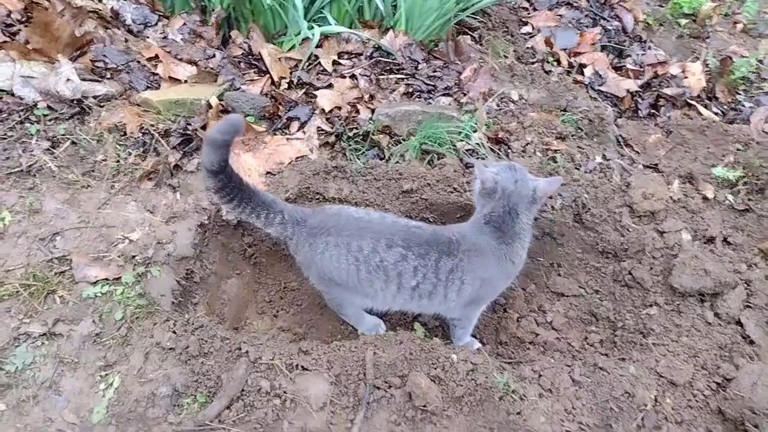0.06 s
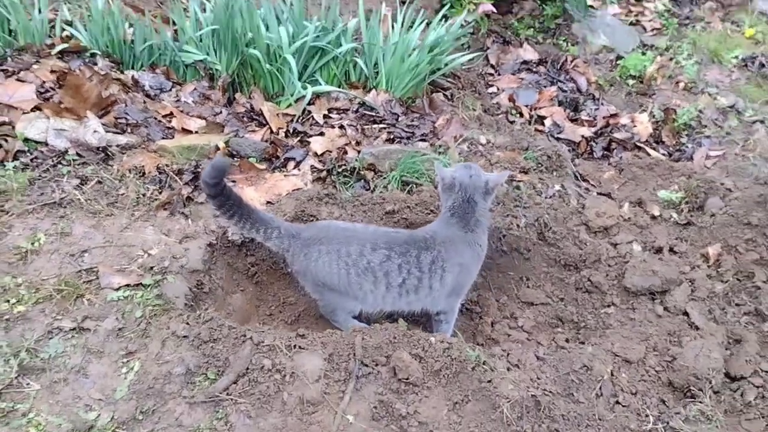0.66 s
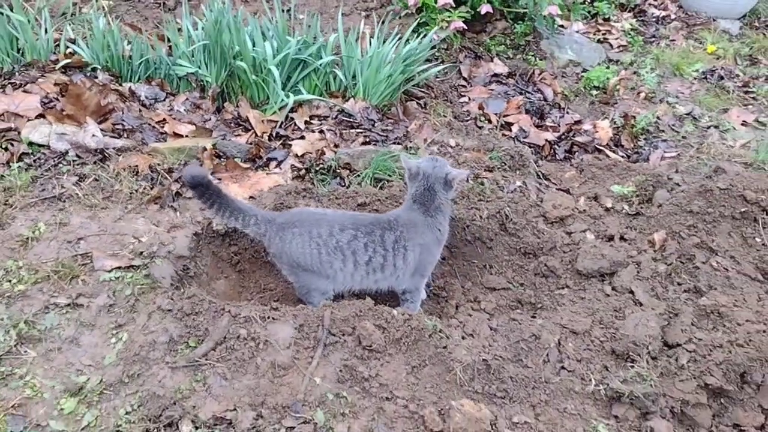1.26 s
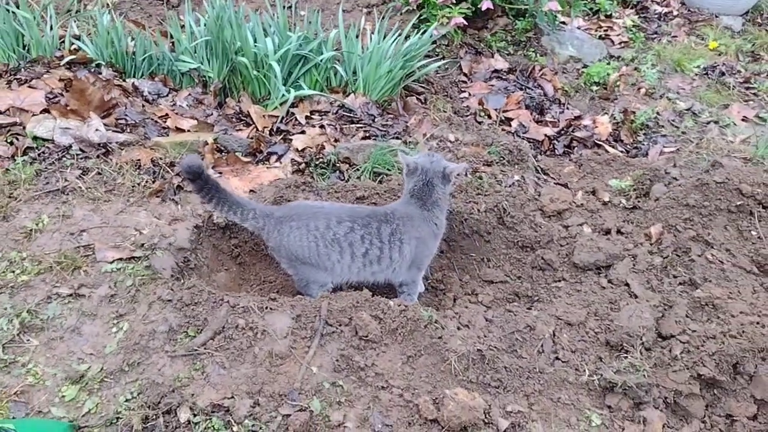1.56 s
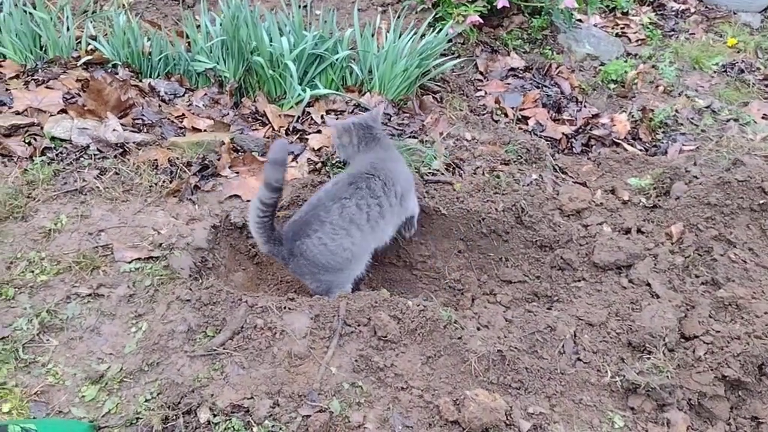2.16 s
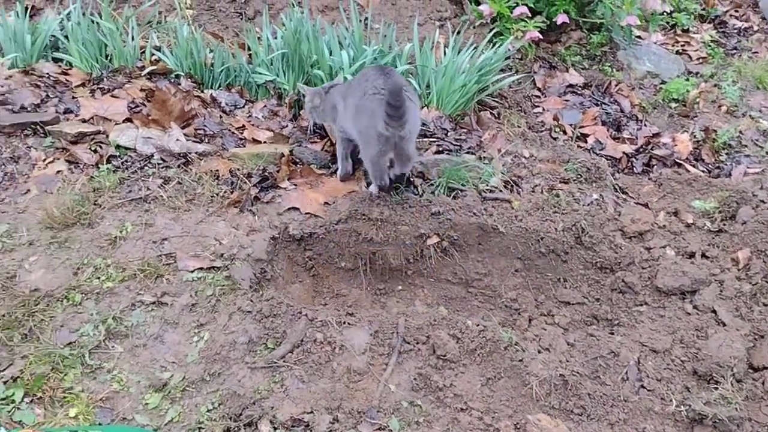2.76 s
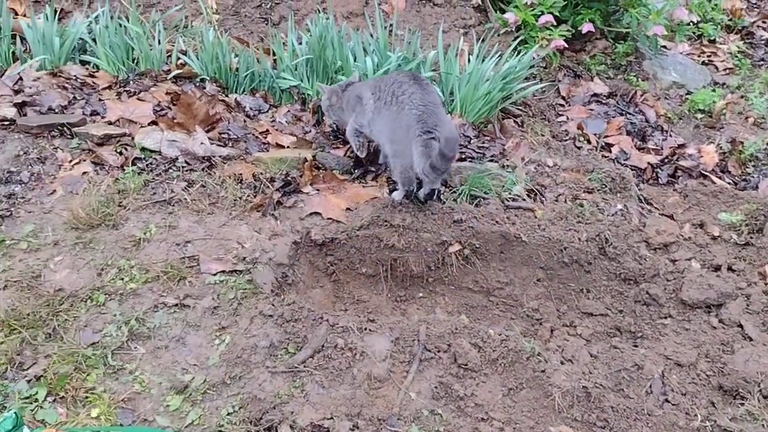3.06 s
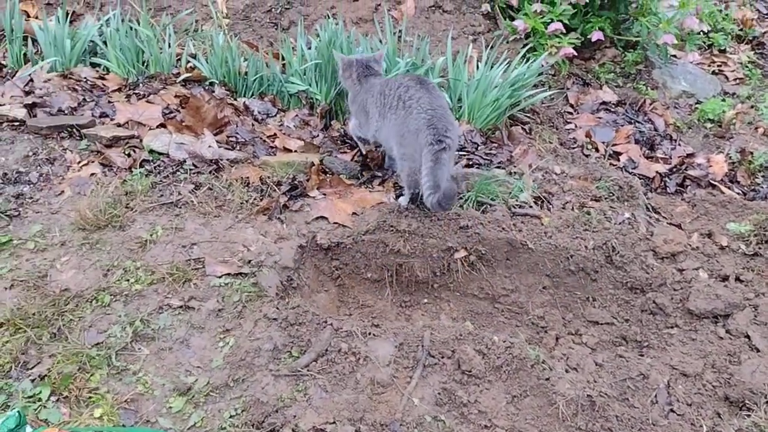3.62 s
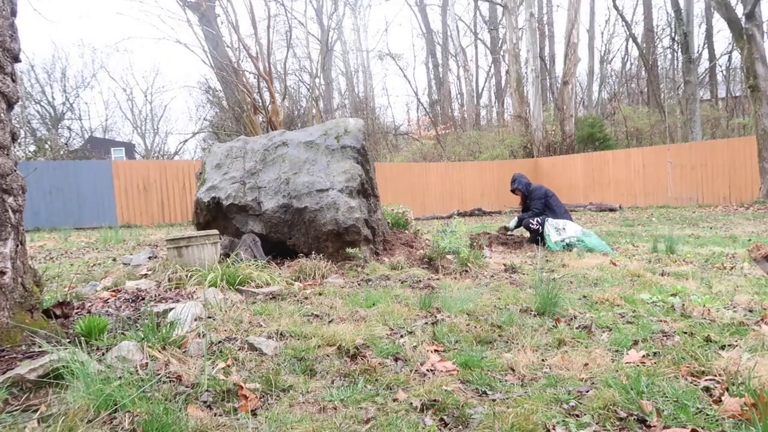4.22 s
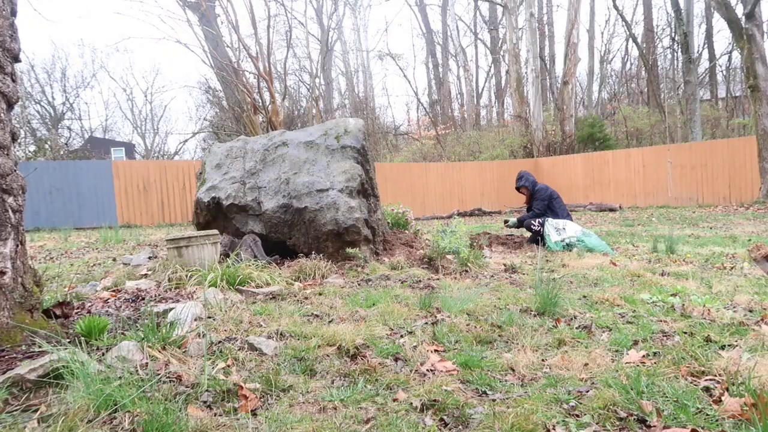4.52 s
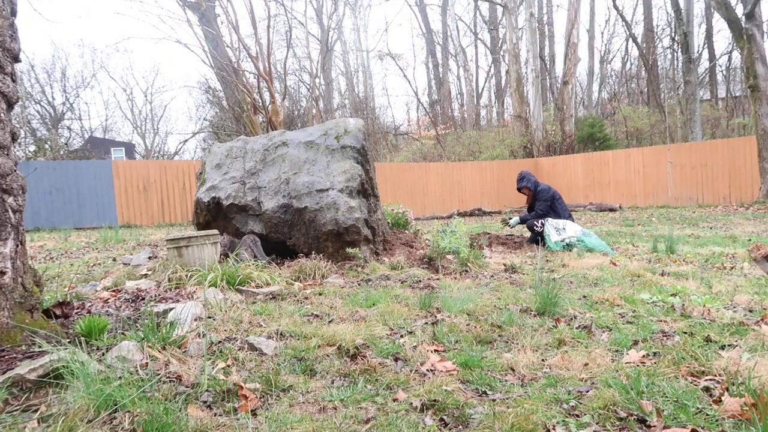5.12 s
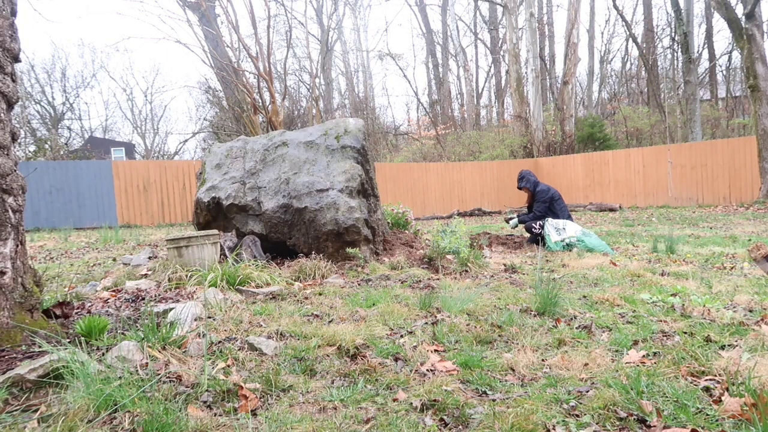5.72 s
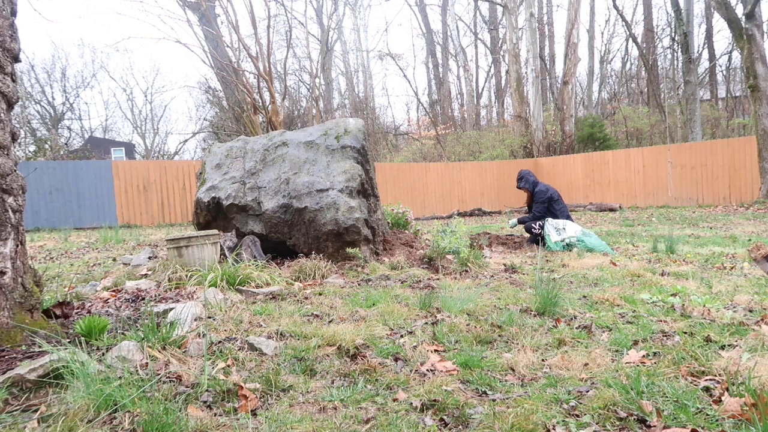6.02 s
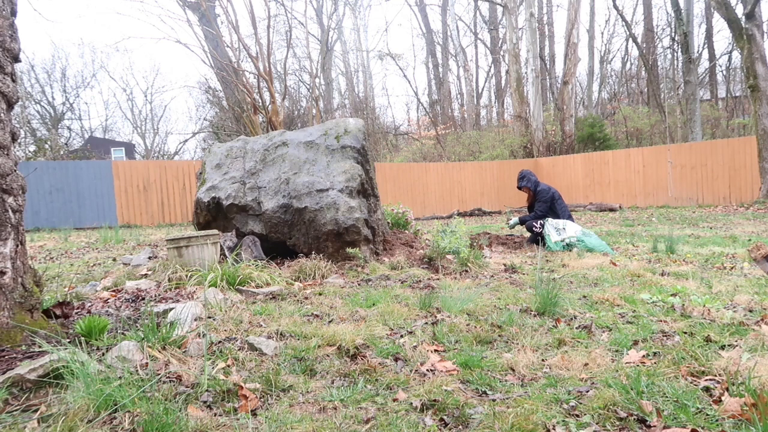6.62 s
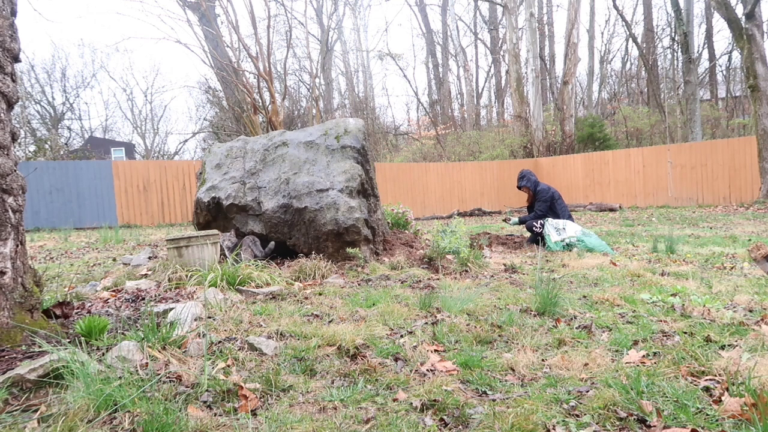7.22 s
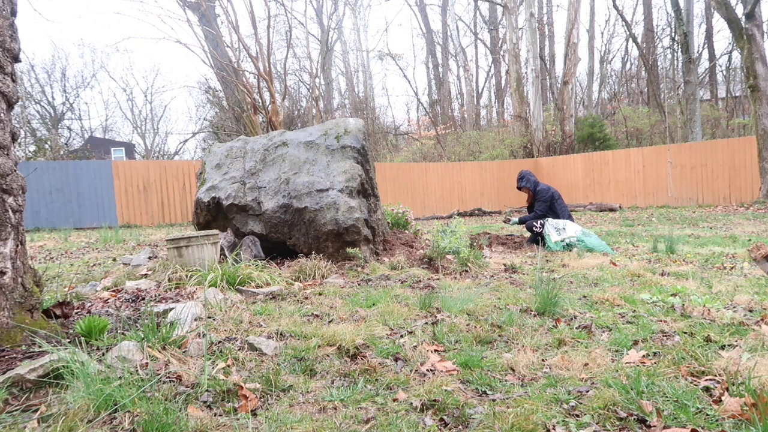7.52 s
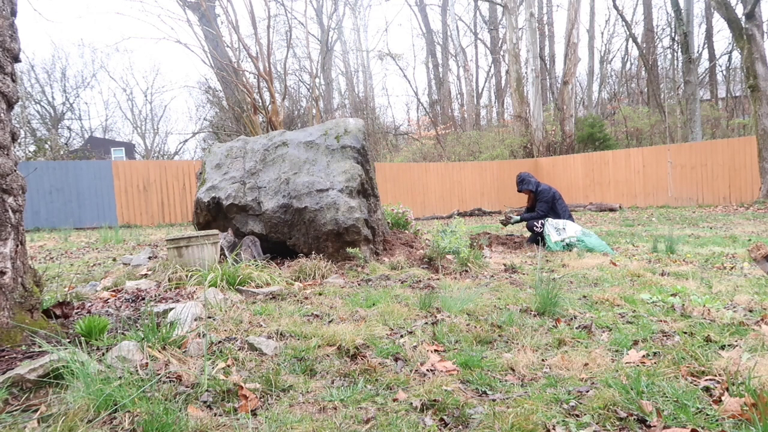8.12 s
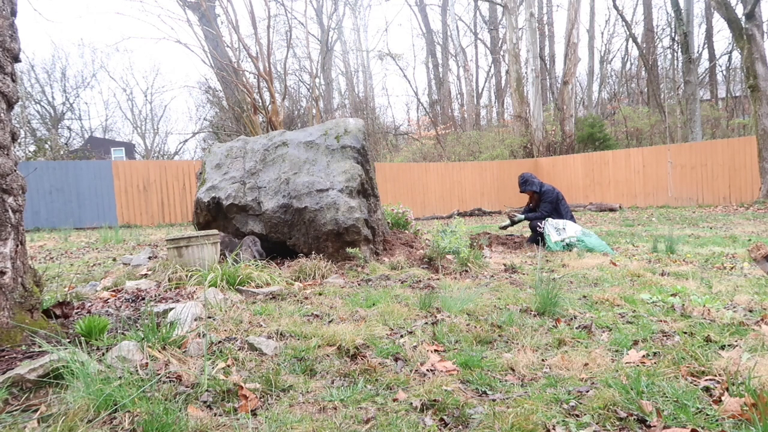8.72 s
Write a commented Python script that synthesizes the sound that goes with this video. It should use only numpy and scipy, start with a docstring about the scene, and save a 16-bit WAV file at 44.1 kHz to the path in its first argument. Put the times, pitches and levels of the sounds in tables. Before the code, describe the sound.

Faint birds chirp in a wet garden above low, far-off traffic, with a few close drips, a tiny leaf rustle and two soft paw steps from a cat. The sound then cuts to a louder spot in the open, where light rain hisses steadily over a rumbling road. Sharp, irregular drops hit leaves beside the microphone, and birds call from the nearby trees in short echoing phrases, closing with a quick trill.

```python
"""A wet garden from two microphone positions. First a quiet flower bed: traffic rumbles far off, drips tap the
leaves close by, birds whistle short motifs over a distant flock, and a cat stirs dead leaves and sets its paws
on the soil. At 3.6 s, after a moment of silence, the open lawn: a loud, steady traffic rush and light rain over
road rumble and hum, with drops ringing on leaves near the microphone. From 5.4 s birds call again, each at its
own pace and echoing in the wood, and a trill ends the scene."""
import sys
import numpy as np
from scipy import signal
from scipy.fft import rfft, irfft, next_fast_len
from scipy.io import wavfile
from scipy.ndimage import uniform_filter1d, map_coordinates

SR = 44100
rng = np.random.default_rng(int(sys.argv[2]) if len(sys.argv) > 2 else 0)


def materialize(psi):
    """Save the field psi as 16-bit PCM at rate SR to the path in sys.argv[1].

    A 1-D psi becomes a single channel; in a 2-D psi each row is a channel.
    """
    bounded = np.clip(np.atleast_2d(psi).T, -1, 1)
    quanta = np.round(bounded * 32767).astype(np.int16)
    wavfile.write(sys.argv[1], SR, quanta)


N = 386757

BED_END_S, LAWN_START_S, LAWN_FADE_IN_S = 3.594, 3.628, 0.014
AIR_DB, RAIN_DB, TOP_HZ = -68.5, -56, 15750

# far traffic from the flower bed: t/s, level/dB
BED_TRAFFIC_LEVELS = [(0.15, -59.5), (0.7, -58), (1.1, -55.5), (1.4, -58.5), (1.85, -58.8), (2.12, -57),
                      (2.5, -61), (3.15, -58.5), (3.4, -59.5)]
# spectra of that traffic, the still air and the dead leaves: f/Hz, level/dB
BED_TRAFFIC_SPECTRUM = [(13, -66), (22, -28), (64, -7), (119, -0.5), (172, -7), (188, -10.5), (219, -6.5),
                        (312, -20), (354, -18), (450, -44), (580, -57), (990, -120)]
BED_AIR_SPECTRUM = [(200, -8), (380, 0.5), (600, -1), (830, 0), (1050, -3.5), (1400, -9), (1750, -5),
                    (2300, -3.5), (3000, -8.5), (4600, -12), (6800, -15), (8800, -25), (15500, -27.5)]
LEAF_SPECTRUM = [(300, -16), (900, -6), (2000, -11.5), (4500, 1.5), (6200, 0.5), (8000, -10.5), (15500, -9)]
# out on the lawn: t/s, road level/dB, relative rush level/dB
LAWN_LEVELS = [(3.78, -36.5, -46), (3.98, -35, -44), (4.17, -37.5, -46), (4.55, -35.5, -45),
               (4.75, -38, -46.5), (4.97, -34.5, -47.5), (5.27, -37, -47), (5.6, -36, -48),
               (6.32, -35, -47), (6.85, -37, -47.5), (7.14, -34.5, -47), (7.6, -36.5, -46),
               (8.05, -36, -46.5), (8.65, -35.5, -48)]
# spectra of the road, its broad traffic rush and the rain on the grass: f/Hz, level/dB
ROAD_SPECTRUM = [(12, -31), (20, -17), (48, -2.5), (107, 0.5), (163, -4), (195, -8.5), (267, -9.5),
                 (430, -22), (520, -22), (680, -47), (1140, -120)]
RUSH_SPECTRUM = [(250, -12), (450, -3), (660, -0.5), (810, 2.5), (900, 0), (1020, 3), (1400, 0.5),
                 (2000, -4), (3200, -10), (4200, -18.5), (7000, -31), (15000, -55.5)]
RAIN_SPECTRUM = [(800, -6), (2200, 5), (3300, 1), (4200, -3.5), (4900, -3.5), (6300, -9), (8000, -12),
                 (10000, -16.5), (12500, -28), (15500, -63)]
# wavering tones in the road noise: f/Hz, level/dB
ROAD_TONES = [(59.2, -45.5), (117.5, -47), (1012, -59.5)]
# stereo width at each position: f/Hz, side minus mid/dB
BED_WIDTH = [(50, -17), (130, -17.5), (300, -11.5), (500, -2.5), (800, -0.5), (1300, 5.5), (2300, -4),
             (3200, 6), (4000, 1), (5000, 0), (15000, 0.5)]
LAWN_WIDTH = [(60, -66), (110, -59), (170, -28.5), (270, -16.5), (450, -8.5), (700, -13), (1050, -13),
              (2000, -11.5), (3300, -7.5), (5500, 1), (9000, 4), (12500, 15), (15500, 20)]
# the lawn leans slightly right: f/Hz, left minus right/dB
LAWN_BALANCE = [(400, 0), (700, -.8), (1200, -2.3), (1900, -1), (3000, -1), (5000, -.3), (12000, 0)]

# distant flock, a row per pitch band: three of chirps, then their thin high overtones
# low f/Hz, high f/Hz, rate/(notes/s), note length/s, level/dB, swell/(dB/s), fade/(dB/s)
FLOCK_BANDS = [(2294, 2800, 22, 0.0297, -67.5, 14, 17), (3046, 3700, 18, 0.0279, -66, 12.5, 7),
               (3600, 4150, 14, 0.0249, -73, 8.5, 16), (4810, 6500, 30, .03, -75.5, 0.5, 36)]
FLOCK_FULL_S, FLOCK_FADES_S = 1.42, 2.62  # the flock is loudest between these times

# the cat brushes through dead leaves: t/s, length/s, level/dB
LEAF_STIRS = [(.69, .06, -69.5), (0.909, .014, -64), (.977, 0.029, -59.5), (1.06, 0.058, -67)]
STIR_RISE_DB_PER_S, STIR_FALL_DB_PER_S = 800, 420
# its paws on loose soil: t/s, level/dB, left minus right/dB
PAW_STEPS = [(1.083, -51, -1), (3.313, -50.5, -11)]
PAW_RISE_S, PAW_T60_S = 0.0015, 0.034

# motifs of the nearer birds, a row per note:
# t/s into the motif, length/s, start f/Hz, end f/Hz, level/dB relative to the call, direct share (0-1)
THIN_NOTE = [(0, 0.097, 3310, 3260, -2, 0.66)]
DOWNSLUR = [(0, .013, 3650, 3240, -5, 0.65), (.015, 0.0249, 3100, 2398, 1.5, 0.77)]
DOWN_UP = [(0, .03, 3240, 3345, -4, .4), (.025, .04, 3700, 4155, -2.5, .15),
           (.066, 0.0158, 3910, 3260, -4, 0.63), (.131, .021, 3480, 4200, -0.5, .85),
           (.2, 0.0246, 2340, 2640, -5, 0.6)]
PIP = [(0, 0.019, 4270, 4200, -4, .75)]
CAROL = [(0, 0.044, 3250, 3350, -7, .55), (.1, .1, 3370, 3140, -4, 0.524), (.2, .12, 3305, 2970, -5, .3)]
ARCHED_CAROL = [(0, .11, 3380, 3660, -2, 0.614), (0.098, 0.101, 3580, 3660, -4, 0.452),
                (.15, .14, 3640, 3360, -6, 0.21), (.06, 0.094, 2840, 2840, -6, .55),
                (.14, .14, 2730, 2550, -4, .4)]
PICKUP = [(0, 0.014, 3730, 3320, 0, 0.96), (.025, .012, 2860, 2620, 0, .9)]
TRILL = [(0, 0.0159, 3884, 3170, 1, 0.91), (.028, 0.0162, 2980, 2700, -1.5, 0.55)]
# calls in the trees around the flower bed: t/s, level/dB, pitch factor
THIN_CALLS = [(.68, -68, 1), (.8, -68, 0.96), (.88, -67, 1)]
DOWNSLUR_CALLS = [(1.026, -61.5, 0.98), (1.268, -60, 0.95), (1.518, -60, 1), (1.762, -59.5, 1),
                  (2.004, -59, 0.98), (2.254, -58, 0.99), (2.503, -58.5, 1), (2.754, -60.5, 0.96),
                  (3.01, -64, 0.98), (3.272, -65, 1)]
DOWN_UP_CALLS = [(1.056, -62.5, 1), (1.435, -61, 1), (1.808, -59, 0.98), (2.187, -58, 1)]
# calls from the wood by the lawn: t/s, level/dB, pitch factor
PIP_CALLS = [(5.42, -41, 0.97), (5.75, -42.5, 0.98)]
CAROL_CALLS = [(5.72, -45.5, 0.97), (6.85, -45.5, 0.99)]
ARCHED_CAROL_CALLS = [(6.165, -45, 1.03), (7.285, -44, 1)]
PICKUP_CALLS = [(8.242, -39.5, 0.97)]
TRILL_CALLS = [(8.328, -40.5, 0.99), (8.422, -42.5, 0.98), (8.516, -43.5, 0.98), (8.619, -43, 1),
               (8.72, -42, .98)]
NOTE_SCATTER, NOTE_WAVER = 0.0111, 0.048  # shares by which a fully scattered note strays and wavers
ECHO_DB = -0.5

# drops on leaves and soil close to the microphone:
# t/s, peak level/dB, ring f/Hz, splash gain/dB, left minus right/dB
NEAR_DROPS = [(.257, -54, 7340, -27, -4), (.372, -53, 5360, -25, -8), (.487, -48, 6300, -16, -3),
              (.648, -52, 7000, -18, 0), (.679, -55, 7500, -3, 0), (.842, -45.5, 4730, -17, -9),
              (3.671, -28.5, 4280, -11, 0), (3.997, -36, 3400, -8, 0), (4.195, -45, 5200, -22, 0),
              (4.339, -44, 9000, -3, 0), (4.379, -47, 7500, -16, 0), (4.473, -45, 5900, -2, 2),
              (4.792, -38, 4380, -19, 4), (4.832, -36.5, 4580, -7, 0), (5.106, -49, 3800, -14, 0),
              (5.126, -32, 5300, -24, 0), (5.153, -27, 2150, -6, -3), (5.153, -29, 6350, -2, -2),
              (5.253, -44.5, 7000, 0, 0), (5.330, -27, 3030, -7, 1), (5.330, -37.5, 6500, 0, 0),
              (5.372, -42, 5300, -22, 0), (5.452, -29, 3100, -9, -3), (5.452, -36, 4600, -22, 0),
              (5.463, -49, 7940, 2, 2), (5.586, -37, 4200, -11, 0), (5.601, -25, 2200, 0, -2),
              (5.607, -37, 5030, -12, 0), (5.608, -47, 9800, -16, 0), (6.163, -30.5, 4400, -23, 1),
              (6.163, -36, 2600, -12, 1), (6.482, -43, 8350, 0, 0), (6.546, -24.5, 2590, -7, -4),
              (6.665, -38, 4280, -22, -2), (6.70, -44, 5200, -10, 0), (7.077, -38, 4970, -19, -5),
              (7.077, -50, 9500, -3, 0), (7.101, -36, 3700, -17, 0), (7.197, -35.5, 3400, -11, 0),
              (7.22, -32.5, 1600, -16, 5), (7.309, -25.5, 2710, -6, -1), (7.313, -27, 4660, -24, 6),
              (7.672, -39, 5000, -28, 0), (7.975, -43, 6900, -2, 0), (8.012, -24.5, 4330, -20, 2),
              (8.247, -25, 2240, -8, 0), (8.248, -31, 4300, -4, 0), (8.253, -25, 2350, -9, -4)]
DROP_RISE_S, RING_CYCLES = 0.00022, 22  # a leaf gives way under the drop, then rings
LONGEST_RING_S = 0.009  # low, soft hits are damped by the soil
SPLASH_RISE_S, SPLASH_T60_S, SPLASH_TAIL_T60_S = 0.00037, 0.017, 0.16
PAT_HZ, PAT_SCATTER, PAT_T60_S = 1866, 0.17, 0.0078  # a wet hit's dull pat varies from leaf to leaf


def amp(db):
    """Decibels to gain."""
    return 10 ** (np.asarray(db) / 20)


def unit(x):
    """Scale to rms 1."""
    return x / np.sqrt(np.mean(x ** 2) + 1e-20)


def decay(t, t60):
    """A gain that falls 60 dB in t60 seconds."""
    return amp(-60 * t / t60)


def attack(t, rise_s):
    """A gain that climbs from 0 towards 1."""
    return 1 - np.exp(-t / rise_s)


def pan(db):
    """Two channel gains, the left db above the right."""
    return amp([[db / 2], [-db / 2]])


def along(points, hz):
    """Read (f/Hz, value) points on a log axis."""
    knots_hz, values = np.transpose(points)
    return np.interp(np.log(hz + 1), np.log(knots_hz + 1), values)


def curves(rows):
    """One value per sample for each column after the time."""
    times, *columns = np.transpose(rows)
    return [np.interp(np.arange(N) / SR, times, column) for column in columns]


def wobble(rate):
    """A smooth random curve, rate knots a second."""
    knots = rng.standard_normal(int(N * rate / SR) + 4)
    return map_coordinates(knots, [np.arange(N) * rate / SR])


def filtered(x, response):
    """Filter x by a gain given as a function of frequency."""
    size = next_fast_len(N + SR // 2)
    return irfft(rfft(x, size) * response(np.fft.rfftfreq(size, 1 / SR)), size)[..., :N]


def add(track, s, sound):
    """Mix a sound into a track at s seconds."""
    part = track[..., max(round(s * SR), 0):][..., :sound.shape[-1]]
    part += sound[..., :part.shape[-1]]


def patchy_noise(depth_db):
    """Two white noises whose gain drifts in patches of time and frequency."""
    spectra = signal.stft(rng.standard_normal((2, N)), nperseg=512)[2]
    patches = uniform_filter1d(rng.standard_normal(spectra.shape[1:]), size=6, axis=0)
    patches = unit(uniform_filter1d(patches, size=14, axis=1))
    return unit(signal.istft(spectra * amp(depth_db * patches), nperseg=512)[1][:, :N])


def band_noise(samples, low_hz, high_hz, order=3):
    """Two band-limited noises of rms 1."""
    band = signal.butter(order, [low_hz, min(high_hz, SR / 3)], "bandpass", fs=SR, output="sos")
    return unit(signal.sosfilt(band, rng.standard_normal((2, samples))))


def grains(rate, spread_db, low_hz, high_hz, cycles):
    """Mid and side of tiny impacts, each a damped ring of its own size, pitch and direction."""
    when, size, pitch, turn = rng.random((int(rate * N / SR), 4)).T[..., None]
    age = np.arange(128)  # samples
    phase = low_hz * (high_hz / low_hz) ** pitch * age / SR
    gain = amp(-spread_db * np.log(np.maximum(size, 0.003)))
    rings = gain * np.sin(2 * np.pi * phase) * np.exp(-phase / cycles)
    at = ((when * N).astype(int) + age).ravel()
    directions = np.cos(2 * np.pi * turn), np.sin(2 * np.pi * turn)
    return unit(np.array([np.bincount(at, (rings * weight).ravel(), N)[:N] for weight in directions]))


def stereo(pair, spectrum, width):
    """Colour two signals as mid and side; left and right come out with a mid of rms 1."""
    mid, side = filtered(pair, lambda hz: amp([along(spectrum, hz),
                                               along(spectrum, hz) + along(width, hz)]))
    return np.array([mid + side, mid - side]) / np.std(mid)


def wood_echo(x, t60, build_s):
    """Trunks scatter a sound into a stereo echo that builds up and dies away."""
    t = np.arange(SR) / SR
    tail = rng.standard_normal((2, SR)) * decay(t, t60) * attack(t, build_s)
    return signal.fftconvolve(x[None], tail / np.linalg.norm(tail[0]), axes=1)


def whistle(length_s, start_hz, end_hz, waver=0, arch=0, octave_db=-28):
    """One slurred bird note with a weak octave; waver and arch bend it by a share of its pitch."""
    progress = np.linspace(0, 1, int(length_s * SR))
    swell = np.abs(np.sin(np.pi * progress))
    quiver = map_coordinates(rng.standard_normal(64), [progress * length_s * 200], mode="mirror")
    hz = (start_hz + (end_hz - start_hz) * progress) * (1 + arch * swell + waver * quiver)
    phase = 2 * np.pi * np.cumsum(hz) / SR
    return (np.sin(phase) + amp(octave_db) * np.sin(2 * phase)) * np.sqrt(swell)


def traffic_and_air():
    """Far traffic rumbles under the still air of the flower bed."""
    traffic_db, = curves(BED_TRAFFIC_LEVELS)
    traffic = amp(traffic_db) * stereo(patchy_noise(depth_db=1.0), BED_TRAFFIC_SPECTRUM, BED_WIDTH)
    air = amp(AIR_DB) * stereo(patchy_noise(depth_db=1.54), BED_AIR_SPECTRUM, BED_WIDTH)
    return traffic + air


def chatter(low_hz, high_hz, rate, length_s):
    """Many far chirps slur up or down around one pitch band, blurred by the trees, evenly loud."""
    notes = np.zeros(N)
    for when, shift, rising in rng.random((int(rate * N / SR), 3)):
        ends_hz = np.array([low_hz, high_hz]) + (shift - 0.5) * (high_hz - low_hz) / 2
        start_hz, end_hz = ends_hz if rising > 0.5 else ends_hz[::-1]
        add(notes, when * N / SR, whistle(length_s, start_hz, end_hz))
    blurred = wood_echo(notes, t60=0.98, build_s=0.0017)[:, :N] + 0.35 * notes
    power = np.abs(uniform_filter1d(np.mean(blurred ** 2, axis=0), size=8000))
    return blurred / np.sqrt(power + 0.014 * power.mean())


def flock():
    """A distant flock swells, holds and fades, a little right of the microphone."""
    track, t = np.zeros((2, N)), np.arange(N) / SR
    early_s, late_s = np.maximum(FLOCK_FULL_S - t, 0), np.maximum(t - FLOCK_FADES_S, 0)
    for low_hz, high_hz, rate, length_s, db, swell, fade in FLOCK_BANDS:
        track += amp(db - swell * early_s - fade * late_s) * chatter(low_hz, high_hz, rate, length_s)
    return track * pan(-2.6)


def cat_in_leaves():
    """Each stir of the cat draws a soft swish from the damp leaves that rises fast, holds and settles."""
    stir, t = np.zeros(N), np.arange(N) / SR
    for s, length_s, db in LEAF_STIRS:
        early_s, late_s = np.maximum(s - t, 0), np.maximum(t - s - length_s, 0)
        stir += amp(db - STIR_RISE_DB_PER_S * early_s - STIR_FALL_DB_PER_S * late_s)
    swish = grains(rate=8000, spread_db=1.6, low_hz=2010, high_hz=12000, cycles=0.6)
    return stir * stereo(swish, LEAF_SPECTRUM, BED_WIDTH)


def cat_paws():
    """A paw set down on soil gives a short muffled knock with no ring."""
    track, t = np.zeros((2, N)), np.arange(SR // 20) / SR
    for s, db, pan_db in PAW_STEPS:
        soil = band_noise(len(t), low_hz=470, high_hz=1200, order=4)
        knock = soil * decay(t, PAW_T60_S) * attack(t, PAW_RISE_S)
        add(track, s, amp(db) * pan(pan_db) * knock)
    return track


def road(level_db):
    """The road as it carries to the lawn: a low rumble with wavering tones in it."""
    t = np.arange(N) / SR
    gain = amp(level_db + 0.15 * wobble(rate=9.1))
    rumble = gain * stereo(patchy_noise(depth_db=0.66), ROAD_SPECTRUM, LAWN_WIDTH)
    hum = sum(amp(db + 3.1 * wobble(rate=3)) * np.sin(2 * np.pi * hz * t + wobble(rate=np.sqrt(hz)))
              for hz, db in ROAD_TONES)
    return rumble + hum


def rain_on_grass():
    """Far drops merge into hiss; nearer ones stay separate small ticks and taps."""
    ticks = 0.5 * grains(rate=450, spread_db=3, low_hz=2500, high_hz=9000, cycles=2)
    taps = 0.3 * grains(rate=32, spread_db=1.6, low_hz=2500, high_hz=9000, cycles=3)
    hiss = patchy_noise(depth_db=0.69)
    return amp(RAIN_DB) * stereo(hiss + ticks + taps, RAIN_SPECTRUM, LAWN_WIDTH)


def lawn():
    """The microphone in the open hears the road, its broad traffic rush and the rain."""
    road_db, rush_db = curves(LAWN_LEVELS)
    traffic = road(road_db)
    rush = amp(rush_db + 1.0) * stereo(patchy_noise(depth_db=0.83), RUSH_SPECTRUM, LAWN_WIDTH)
    ambience = traffic + rush + rain_on_grass()
    return filtered(ambience, lambda hz: amp(np.outer([1, -1], along(LAWN_BALANCE, hz) / 2)))


def song(motif, calls, echo_t60, arch=0, octave_db=-28):
    """A motif sung at each call; the farther a note, the more it strays, wavers and echoes."""
    track = np.zeros((2, N))
    for call_s, call_db, pitch in calls:
        for note_s, length_s, start_hz, end_hz, note_db, direct in motif:
            tune = pitch * (1 + NOTE_SCATTER * (1 - direct) * rng.normal())
            waver = NOTE_WAVER * (1 - direct)
            note = whistle(length_s, tune * start_hz, tune * end_hz, waver, arch, octave_db)
            note *= amp(call_db + note_db)
            echo = wood_echo(note, t60=echo_t60, build_s=0.0031)
            echo += echo.mean(axis=0)  # draws the echo towards the centre
            add(track, call_s + note_s, direct * note)
            add(track, call_s + note_s, np.sqrt(1 - direct ** 2) * amp(ECHO_DB) * echo)
    return track


def birds():
    """Nearer birds reach the microphone directly and as echo from the wood."""
    return (song(THIN_NOTE, THIN_CALLS, echo_t60=1.0, arch=0.008)
            + song(DOWNSLUR, DOWNSLUR_CALLS, echo_t60=1.0, arch=-0.019)
            + song(DOWN_UP, DOWN_UP_CALLS, echo_t60=1.0, arch=-0.015)
            + song(PIP, PIP_CALLS, echo_t60=0.88)
            + song(CAROL, CAROL_CALLS, echo_t60=0.86, arch=0.006)
            + song(ARCHED_CAROL, ARCHED_CAROL_CALLS, echo_t60=1.0, arch=0.0154, octave_db=-22)
            + song(PICKUP, PICKUP_CALLS, echo_t60=0.7, arch=0.015)
            + song(TRILL, TRILL_CALLS, echo_t60=0.86, arch=0.028))


def near_drops():
    """Each close drop pats a leaf, snaps it into brief ringing and throws a splash around that pitch."""
    track, t = np.zeros((2, N)), np.arange(SR // 20) / SR
    splash_shape = (decay(t, SPLASH_T60_S) + 0.14 * decay(t, SPLASH_TAIL_T60_S)) * attack(t, SPLASH_RISE_S)
    for s, db, hz, splash_db, pan_db in NEAR_DROPS:
        ring = np.sin(2 * np.pi * hz * t) * decay(t, min(RING_CYCLES / hz, LONGEST_RING_S))
        spray = band_noise(len(t), low_hz=hz / 2.36, high_hz=1.3 * hz)
        spray += amp(-19.5) * band_noise(len(t), low_hz=3980, high_hz=9350)
        mid, side = spray * splash_shape
        pat_hz = PAT_HZ * np.exp(PAT_SCATTER * rng.normal())
        pat = amp(4.0) * np.sin(2 * np.pi * pat_hz * t) * decay(t, PAT_T60_S)
        splash = pat + mid + 0.5 * np.array([side, -side])
        drop = (ring + amp(splash_db) * splash) * attack(t, DROP_RISE_S)
        add(track, s, amp(db) * pan(pan_db) * drop / np.abs(drop).max())
    return track


def scene():
    """The flower bed, a moment of silence, then the lawn; birds and drops sound at both positions."""
    t = np.arange(N) / SR
    at_bed = t < BED_END_S
    on_lawn = np.clip((t - LAWN_START_S) / LAWN_FADE_IN_S, 0, 1)
    flower_bed = traffic_and_air() + cat_in_leaves() + cat_paws() + flock()
    return at_bed * flower_bed + on_lawn * lawn() + (at_bed + on_lawn) * (birds() + near_drops())


def record(dry):
    """The camera microphone keeps nothing above its band limit."""
    return filtered(dry, lambda hz: hz < TOP_HZ)


dry = scene()
out = record(dry)
materialize(out)
```